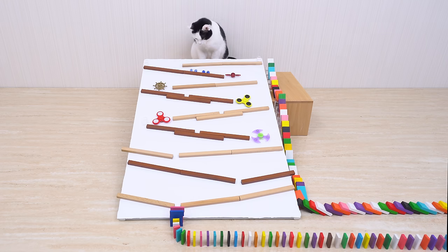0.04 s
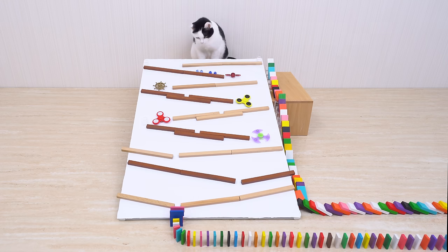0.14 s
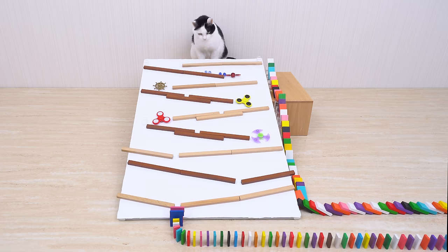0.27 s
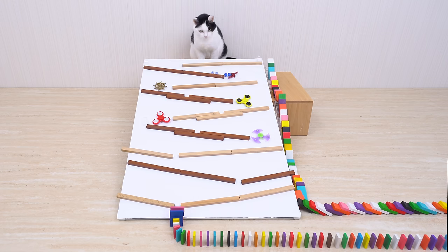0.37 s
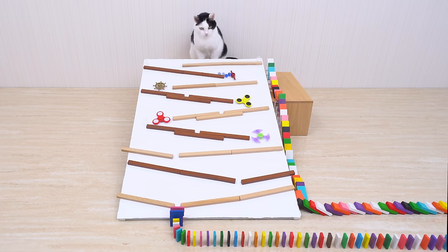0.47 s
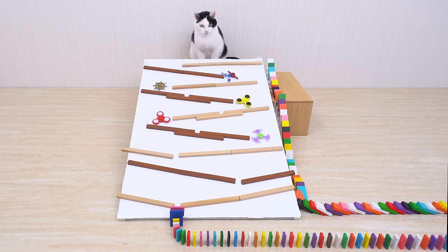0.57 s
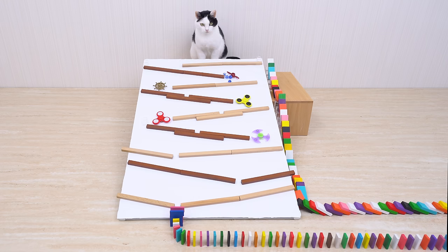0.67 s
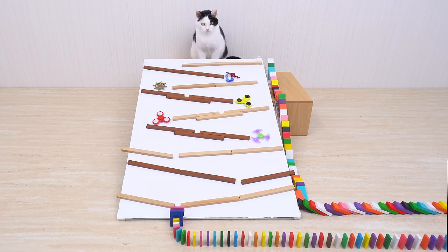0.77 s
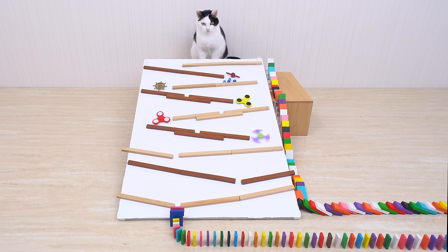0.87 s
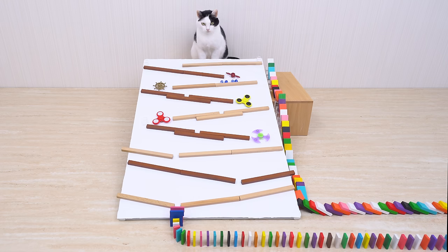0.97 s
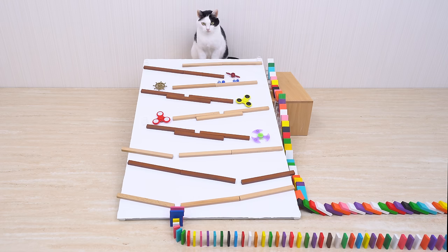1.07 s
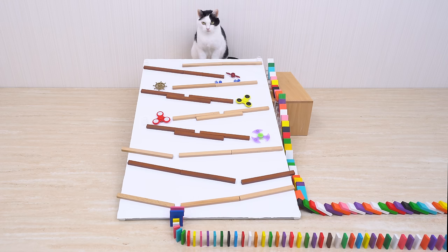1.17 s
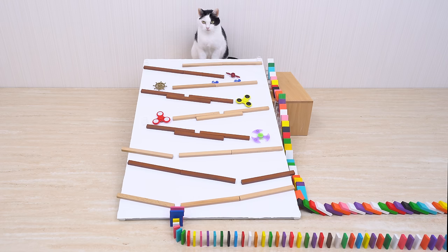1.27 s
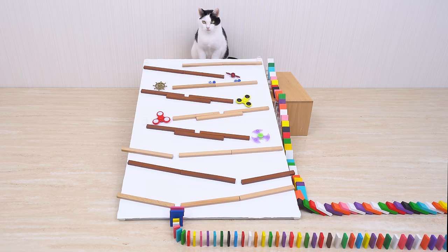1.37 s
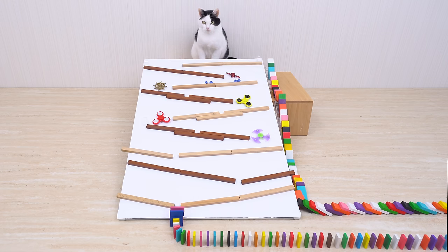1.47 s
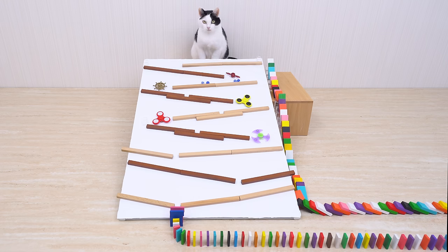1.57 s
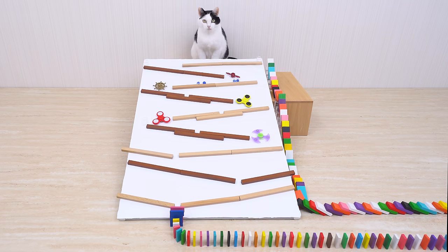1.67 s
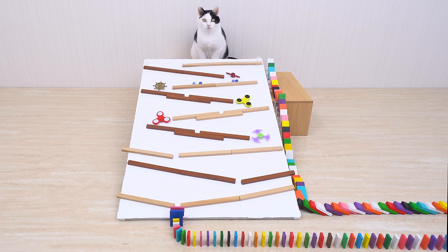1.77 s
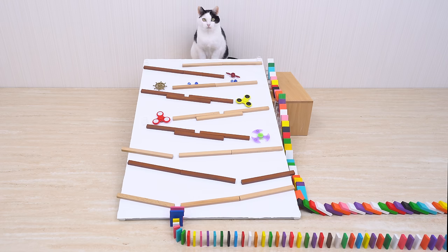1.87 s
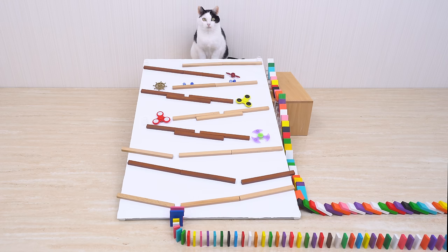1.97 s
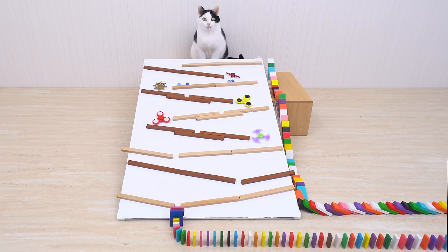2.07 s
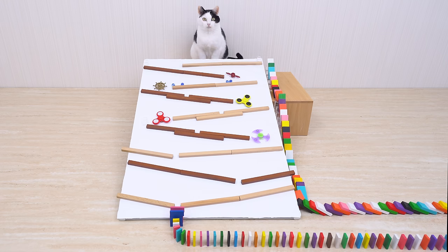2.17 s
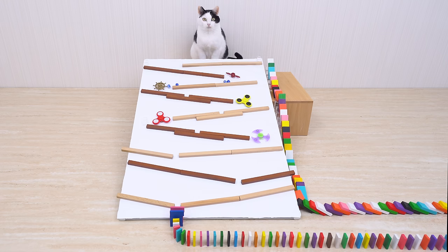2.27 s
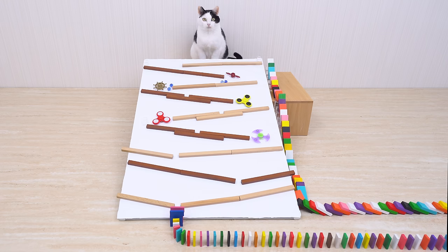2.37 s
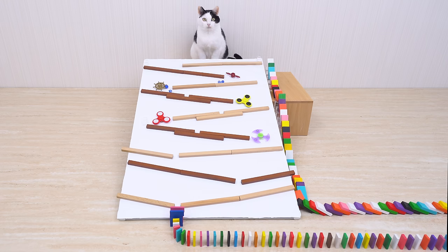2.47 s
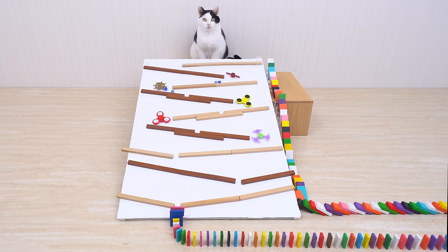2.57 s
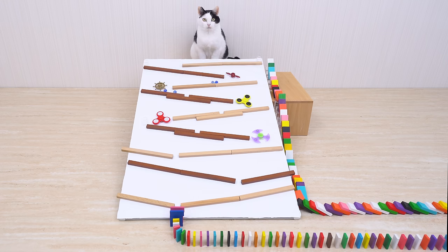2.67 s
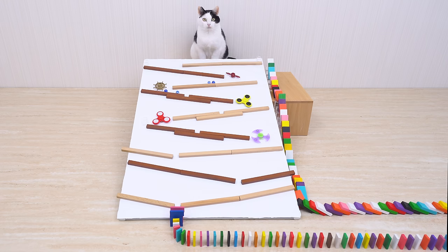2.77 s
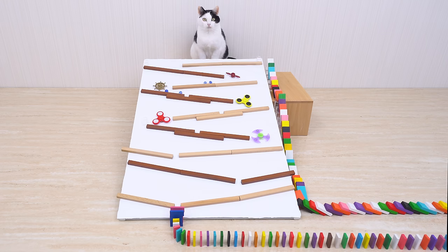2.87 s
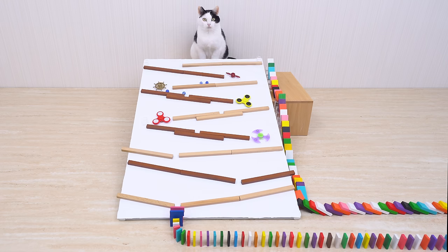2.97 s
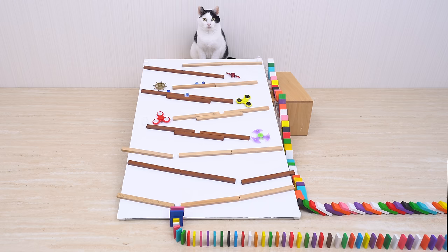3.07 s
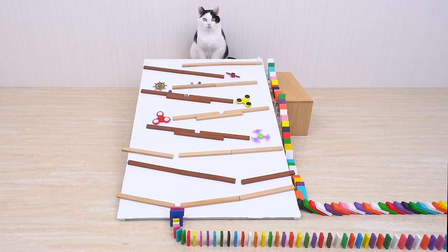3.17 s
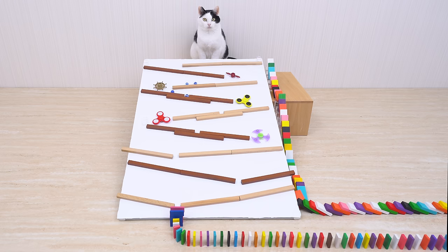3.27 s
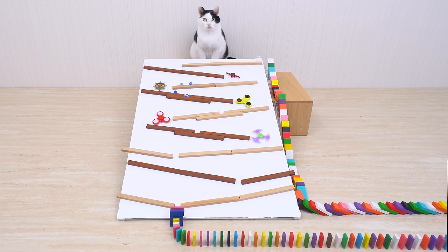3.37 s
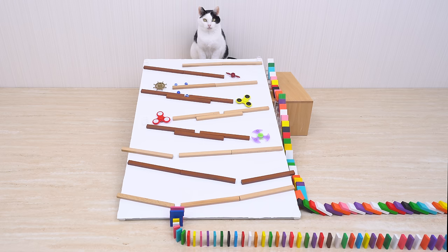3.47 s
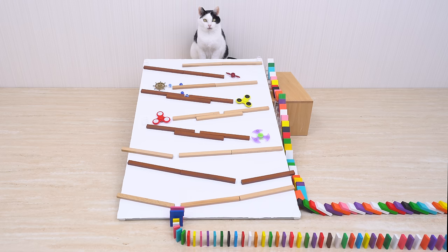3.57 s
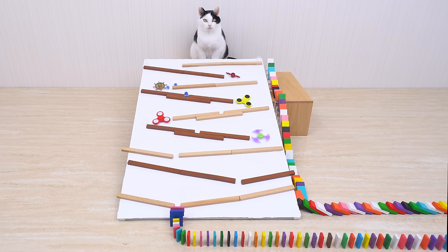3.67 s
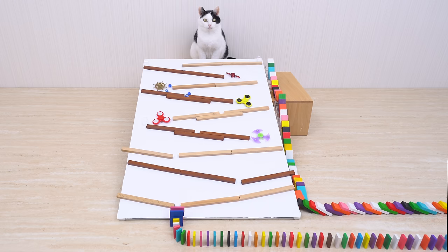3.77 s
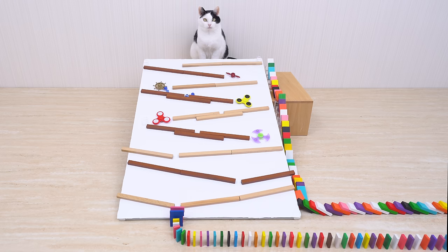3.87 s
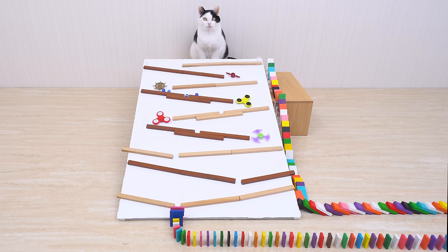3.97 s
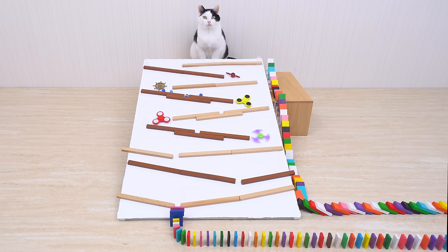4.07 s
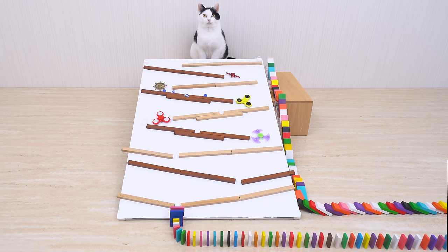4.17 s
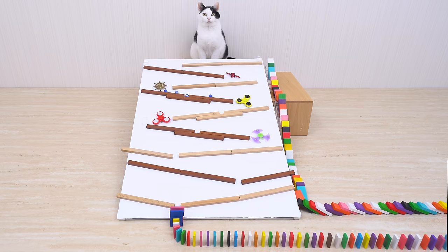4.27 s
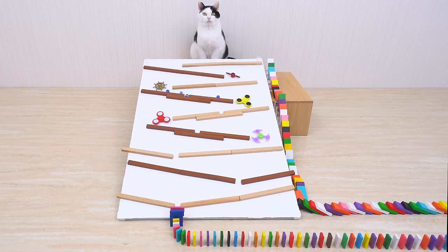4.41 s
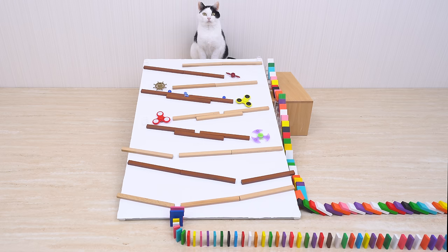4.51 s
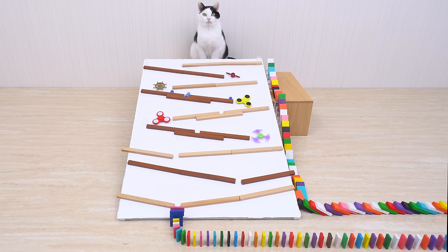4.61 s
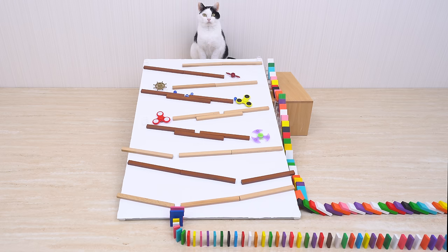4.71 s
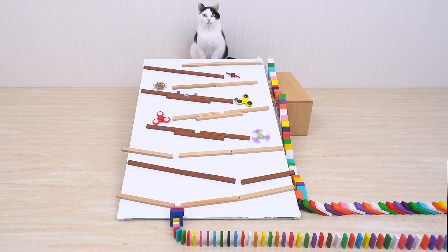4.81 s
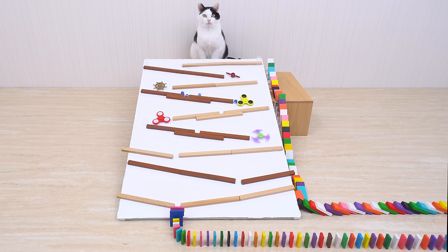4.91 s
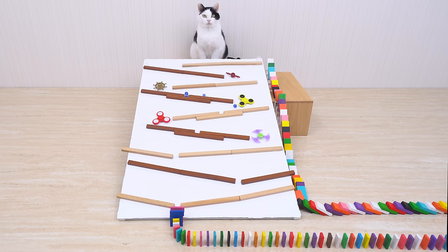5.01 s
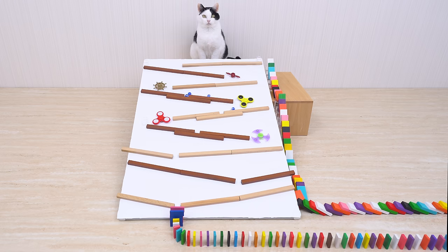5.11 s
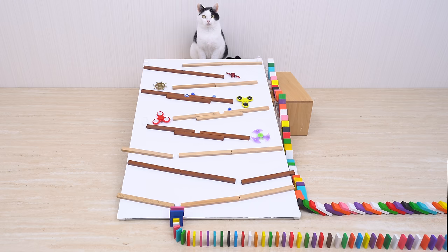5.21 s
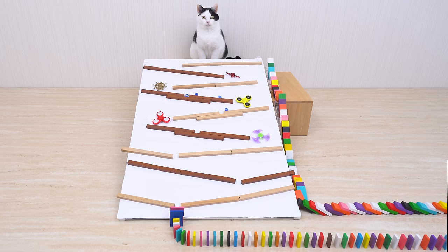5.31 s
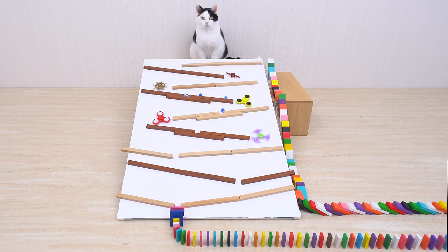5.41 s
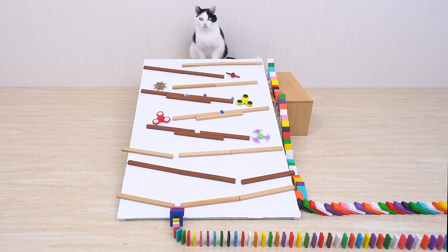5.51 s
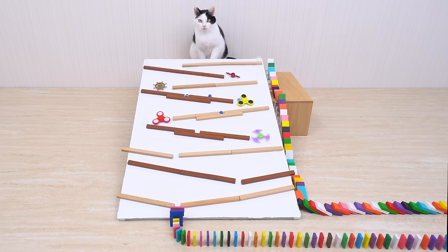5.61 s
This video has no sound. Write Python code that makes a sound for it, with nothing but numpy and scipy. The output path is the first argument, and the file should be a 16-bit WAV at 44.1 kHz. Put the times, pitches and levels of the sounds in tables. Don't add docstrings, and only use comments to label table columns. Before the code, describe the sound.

Several small glass marbles run down a slatted, tilted hollow board, close to the microphone in a quiet bare room. A busy cluster of clicks, glass clinks and a ringing metal spinner comes in the first second, then soft rolling and light bumps, then scattered sharp wooden cracks with hollow thumps until the end. A near wall throws back each click.

```python
import sys
import numpy as np
from scipy import signal
from scipy.fft import rfft, irfft
from scipy.io import wavfile

SR = 44100
rng = np.random.default_rng(int(sys.argv[2]) if len(sys.argv) > 2 else 0)


def rack_gain(trim_db):
    fader = np.asarray(trim_db, float)
    return 10 ** (fader / 20)


def wav_out(sig):
    wavfile.write(sys.argv[1], SR, np.round(np.clip(np.atleast_2d(sig).T, -1, 1) * 32767).astype(np.int16))


N = 249165
TOUCH_DELAY_S = 0.0006

# (freq_hz, density_db)
RASP = [(700, -10), (1100, -1.5), (2000, 4), (4300, -6), (5200, -15), (12000, -24.5), (13300, -53.5)]
# (start_s, level_db, board_pitch_hz)
BUMPS = [(.17, -55, 550), (0.2866, -40.5, 412), (0.408, -39.5, 524), (0.549, -37, 420), (.584, -30, 427.5),
         (1.557, -65, 344), (1.994, -40.5, 430), (2.024, -50, 422.5), (2.063, -59.5, 400),
         (2.107, -49.5, 415), (2.151, -44.5, 412), (2.178, -56, 428), (2.275, -43, 393), (2.313, -53, 433),
         (2.657, -63, 424), (3.4641, -37.5, 405), (3.488, -56.5, 444), (3.518, -60, 393),
         (3.915, -40.5, 377), (4.003, -45, 657), (4.509, -55, 795), (4.7587, -36.5, 635), (4.966, -53, 420)]

# (board_pitch_hz, thump_db under the crack,
# own pitches [(lift_db, freq_hz, width_hz)], slat knocks [(freq_hz, level_db over the thump, t60_s)])
TOP_SLAT = (540, -19, [(9.3, 3298, 330)], [(571, 2.5, 0.21), (488.4, 0, 0.2), (420, 3, 0.084),
            (288.4, -2, 0.099)])
SHORT_SLAT = (600, -18, [(6.7, 1830, 870)], [(983, 7.4, 0.11), (1050, 1.7, 0.074)])
LONG_SLAT = (675, -23.5, [(3, 2110, 180), (3, 4300, 1100)], [(789, 4.5, 0.11), (404.4, 4.5, 0.11),
             (257.5, -5.5, 0.18)])
SLAT_FOOT = (380, -20.5, [(1.2, 2800, 400)], [(392.6, 1, 0.093), (791, 0, 0.12), (267.5, -2, 0.1)])
HUB = (570, -18.5, [(10, 2000, 460), (3.5, 4440, 310), (0, 4050, 1400)], [(789, 4.5, 0.12),
       (390, -4.5, .1)])
LOW_SLAT = (430, -24.5, [(4.1, 4070, 970)], [(575, 9.3, 0.055)])
RAIL = (610, -12.5, [(5.88, 2730, 640)], [])
EDGE = (396, -25, [(-4, 1000, 1700)], [])
THICK_SLAT = (470, -24.5, [(6.9, 2530, 1140)], [(525, 2.4, 0.1), (966, 1.5, .08)])

# (start_s, crack_db, glass_tick_db, glass_fizz_db)
ON_TOP_SLAT = [(0.6874, -21.5, -38, -48), (0.824, -24, -34.5, -33), (0.9096, -24.5, -42.5, -54.5),
               (0.9533, -24, -42, -47), (1.0238, -24.5, -44.5, -54), (1.0711, -38, -56, -71)]
ON_SHORT_SLAT = [(1.2773, -43.5, -77.5, -104), (1.403, -44, -72.5, -77), (2.6705, -41.5, -73, -65)]
ON_LONG_SLAT = [(2.5132, -24, -41, -49), (2.7172, -26, -45.5, -52.5), (3.2313, -27.5, -59, -74),
                (3.8494, -26, -45.5, -49)]
ON_SLAT_FOOT = [(3.1613, -32.5, -58.5, -70), (4.0283, -26, -49, -50), (4.0792, -32.5, -56, -43),
                (4.7138, -39.5, -94, -83)]
ON_HUB = [(3.7523, -34, -43, -46), (4.6079, -34, -42.5, -49), (5.0818, -39.5, -67.5, -100)]
ON_THICK_SLAT = [(5.1421, -21.5, -38.5, -46.5)]
ON_LOW_SLAT = [(5.5597, -33.5, -57, -60.5), (5.6348, -27.5, -49.5, -49)]
ON_RAIL = [(0.0733, -41, -76, -100), (0.2189, -50, -92, -85), (0.3392, -42.5, -65, -45.5),
           (0.4487, -38, -42, -40.5), (0.5835, -38, -36, -67)]
ON_EDGE = [(0.5929, -30.5, -36.5, -33.5), (1.9474, -62, -83, -90), (2.3386, -46.5, -76, -44),
           (3.6836, -42, -54.5, -49.5), (3.9266, -39.5, -48.5, -43.5), (4.7589, -32, -44, -34)]
LANDINGS = [(TOP_SLAT, ON_TOP_SLAT), (SHORT_SLAT, ON_SHORT_SLAT), (LONG_SLAT, ON_LONG_SLAT),
            (SLAT_FOOT, ON_SLAT_FOOT), (HUB, ON_HUB), (LOW_SLAT, ON_LOW_SLAT),
            (THICK_SLAT, ON_THICK_SLAT), (RAIL, ON_RAIL), (EDGE, ON_EDGE)]


def evened(x):
    return x / np.sqrt(np.mean(x ** 2) + 1e-20)


def read(points, hz):
    f, value = np.transpose(points)
    return np.interp(np.log(hz + 1), np.log(f + 1), value)


def add(mix, start_s, sound):
    part = mix[round(start_s * SR):][:len(sound)]
    part += sound[:len(part)]


def ring(hz, t60_s, rise_s, length_s):
    t = np.arange(round(length_s * SR)) / SR
    decay = rack_gain(-60 * t / t60_s)
    return np.sin(2 * np.pi * hz * t) * decay * (1 - np.exp(-t / rise_s))


def coloured(points):
    hz = np.fft.rfftfreq(N, 1 / SR)
    spectrum = rfft(rng.standard_normal(N)) * rack_gain(read(points, hz))
    return evened(irfft(spectrum, N))


def air():
    # (freq_hz, density_db)
    air_colour = [(12, -57.5), (20, -25), (93, -8.5), (148, -10), (234, -5.5), (550, -3.5), (850, -10),
                  (1390, -15), (1640, -27.5), (4000, -36), (12800, -37), (13300, -72.5), (22000, -100)]
    return rack_gain(-69) * coloured(air_colour)


def earlier_landing():
    t = np.arange(N) / SR
    return rack_gain(-59 - 60 * t / 0.36) * coloured(RASP)


def scuffs():
    # (start_s, level_db)
    skids = [
        (1.94, -70.5),
        (.46, -68.5),
    ]
    rise_s, t60_s = 0.015, 0.4
    swell = np.zeros(N)
    t = np.arange(SR // 2) / SR
    for start_s, level_db in skids:
        add(swell, start_s, rack_gain(level_db - 60 * t / t60_s) * (1 - np.exp(-t / rise_s)))
    return swell * coloured([(1500, -21.5), (4300, 0.5), (5500, -8), (11500, -10.5), (13500, -30)])


def board(centre_hz, octaves, damping):
    # (freq_hz, width_hz, level_db)
    board_modes = [(264, 46, -23.5), (295, 15, -1), (411.8, 30, 7.5), (449, 10, -8), (469, 42, 5.5),
                   (529, 65, 9.5), (731.7, 20, -0.5), (800.6, 40.8, 7.5), (930, 37.6, 2.5), (1240, 174, -5)]
    body = 0
    for hz, width_hz, level_db in board_modes:
        off_centre = np.log2(hz / centre_hz) / octaves
        t60_s = 2.2 / width_hz / damping
        body = body + rack_gain(level_db - 8.4 * off_centre ** 2) * ring(hz, t60_s, 0.00054, 0.12)
    return body / abs(body).max()


def rolling():
    # (start_s, level_db)
    effort = [(0, -58.5), (.12, -61), (.45, -62), (.6, -60.5), (.9, -61), (1.3, -77.5), (1.75, -79.5),
              (2, -70), (2.3, -70.5), (2.45, -77.5), (2.72, -59.5), (3.05, -72.5), (3.4, -63), (3.65, -66),
              (4.3, -88.5), (4.65, -69), (5.3, -71.5), (5.65, -97)]
    t = np.arange(N) / SR
    bumps = rng.standard_normal(N)
    bumps = bumps * rack_gain(2.5 * np.minimum(rng.exponential(1, N), 3))
    bumps = bumps * (rng.random(N) < 500 / SR)
    hum = evened(signal.oaconvolve(bumps, board(458, 1.0, 1.3))[:N])
    rasp = rack_gain(-17) * coloured(RASP)
    return rack_gain(np.interp(t, *np.transpose(effort))) * (hum + rasp)


def spinner(blows, modes, shapes, rattle_db):
    out = np.zeros(N)
    knots = np.arange(0, SR // 2, 300)
    t = np.arange(2000) / SR
    for start_s, blow_db, lean_db, side_db in blows:
        levels_db = [blow_db + db + min(lean * lean_db, 0) + side * side_db for db, lean, side in shapes]
        for level_db, (hz, t60_s) in zip(levels_db, modes):
            flutter = np.interp(np.arange(SR // 2), knots, rng.standard_normal(SR // 600 + 1))
            add(out, start_s + TOUCH_DELAY_S, rack_gain(level_db + 4.0 * flutter) * ring(hz, t60_s, 0.0003, 0.5))
        high = signal.butter(2, 5000, "highpass", fs=SR)
        rattle = signal.lfilter(*high, rng.standard_normal(2000))
        rattle_level = rack_gain(levels_db[-2] + rattle_db - 60 * t / 0.012)
        add(out, start_s + TOUCH_DELAY_S, rattle_level * rattle)
    return out


def first_spinner():
    # (start_s, level_db, lean_db to one side of the arm, side_modes_db)
    first_blows = [
        (0.3391, -42.5, -16, -2.5),
        (0.4496, -43, 4.5, -0.5),
        (0.5404, -41, -5, -12.5),
        (0.5928, -30.5, -3, -27),
    ]
    # (freq_hz, t60_s)
    first_modes = [(4231, .3), (7905, .2), (8157, .26), (15108, .07), (15518, .12)]
    # (level_db, lean_share, side_share)
    first_shapes = [(-15.5, -.2, 1.01), (-1.7, 0.88, .01), (-6, -0.93, .01), (6.6, -0.44, 1.2),
                    (0.6, .3, 1.01)]
    return spinner(first_blows, first_modes, first_shapes, rattle_db=2.5)


def second_spinner():
    # (start_s, level_db, lean_db, side_mode_db)
    second_blows = [(2.3361, -37, 21, -3.5), (2.5274, -37, 28, -15), (2.5632, -47.5, -11, -4.5),
                    (3.926, -43, -10, -3), (4.0667, -60, -3, -19), (4.079, -53, 1, 5)]
    # (freq_hz, t60_s)
    second_modes = [(8479, .05), (11087, .03), (14950, .025)]
    # (level_db, lean_share, side_share)
    second_shapes = [(0, -1.5, 0), (0, 0, 1), (-2, 1, 0)]
    return spinner(second_blows, second_modes, second_shapes, rattle_db=-4.0)


def knocks():
    out = np.zeros(N)
    for (_, thump_db, _, modes), rows in LANDINGS:
        for start_s, crack_db, *_ in rows:
            for hz, level_db, t60_s in modes:
                knock = -rack_gain(crack_db + thump_db + level_db) * ring(hz, t60_s, 0.0023, 0.2)
                add(out, start_s + TOUCH_DELAY_S, knock)
    for start_s, level_db, hz in BUMPS:
        add(out, start_s, rack_gain(level_db - 8.5) * ring(hz, 0.11, 0.0023, 0.2))
    return signal.sosfilt(signal.butter(2, 180, "highpass", fs=SR, output="sos"), out)


def contact(crack_db, tick_db, fizz_db, tocks=()):
    colour = [(300, crack_db - 10.5), (900, crack_db + 14), (1400, crack_db + 11.5),
              (2200, crack_db + 16.0), (4400, crack_db + 13.5),
              (6200, tick_db + 24.5), (9000, tick_db + 24.5),
              (11000, fizz_db + 23.5), (15500, fizz_db + 18.5), (17500, fizz_db - 6.5)]
    hz = abs(np.fft.fftfreq(2048, 1 / SR))
    gain_db = read(colour, hz)
    for lift_db, peak_hz, width_hz in tocks:
        gain_db = gain_db + lift_db / (1 + (2 * (hz - peak_hz) / width_hz) ** 2)
    log_gain = np.log(rack_gain(gain_db))
    phase = -signal.hilbert(log_gain).imag
    click = np.fft.ifft(np.exp(log_gain + 1j * phase)).real[:1024]
    slips = rng.standard_normal(90) * (rng.random(90) < 0.2) * np.exp(-np.arange(90) / 30)
    return np.convolve(click, np.r_[-1, 0.15 * slips])


def landing(place, crack_db, tick_db, fizz_db):
    board_hz, thump_db, tocks, _ = place
    sound = -rack_gain(crack_db + thump_db + 6) * board(board_hz, 0.69, 1.1)
    add(sound, 0, contact(crack_db, tick_db, fizz_db, tocks))
    return sound


def marbles():
    # (start_s, tick_db, fizz_db)
    clinks = [(.282, -67, -86), (0.384, -43, -47), (0.4027, -37, -49), (0.543, -32, -37), (.5493, -40, -42),
              (.5612, -54, -47), (0.6607, -42, -44), (0.8742, -40, -42.5), (0.9502, -32.5, -38),
              (1.347, -67, -91.5), (4.0042, -43.5, -56), (4.067, -44.5, -55.5), (4.9108, -61.5, -59.5),
              (5.3492, -66, -61.5), (5.514, -70, -68)]
    out = np.zeros(N)
    for place, rows in LANDINGS:
        for start_s, *levels_db in rows:
            add(out, start_s + TOUCH_DELAY_S, landing(place, *levels_db))
    for start_s, tick_db, fizz_db in clinks:
        add(out, start_s + TOUCH_DELAY_S, contact(tick_db - 8.5, tick_db - 4, fizz_db + 1.0))
    for start_s, level_db, hz in BUMPS:
        add(out, start_s, rack_gain(level_db - 8) * board(hz, 0.32, 1.0))
    return out


def tail():
    # (freq_hz, t60_s)
    room_decay = [(200, 0.27), (500, 0.39), (1000, 0.55), (2000, 0.48), (4000, 0.52), (8000, .45),
                  (16000, 0.2945)]
    # (freq_hz, level_db)
    room_colour = [(200, -7), (600, 8), (1400, 2), (2500, 1), (4500, 1), (9000, -2.5), (15700, -0.5),
                   (16200, -28)]
    taps = np.zeros(SR)
    at = np.arange(0, SR - 20, 20) + rng.integers(0, 20, (SR - 1) // 20)
    taps[at] = rng.choice([-1., 1.], len(at))
    hz, t, z = signal.stft(taps, SR, nperseg=256)
    gain_db = read(room_colour, hz)[:, None] - 60 * t / read(room_decay, hz)[:, None]
    out = signal.istft(z * rack_gain(gain_db), SR, nperseg=256)[1][:SR]
    out = out * (1 - np.exp(-(np.arange(SR) / SR / 0.0089) ** 2))
    return out / np.linalg.norm(out)


def room(x):
    # (delay_s, level_db)
    reflections = [(.0009, -12.5), (.0033, -10.5), (0.0138, -6), (0.0144, -16), (0.021, -21)]
    early = np.zeros(SR // 10)
    for delay_s, level_db in reflections:
        early[round(delay_s * SR)] = rack_gain(level_db)
    early = signal.lfilter(*signal.butter(1, 7000, fs=SR), early)
    scatter = rng.choice([-1., 1.], 70) * (rng.random(70) < 0.25) * np.exp(-np.arange(70) / 30)
    add(early, 0, np.r_[0.85, 0.3 * scatter])
    out = signal.oaconvolve(x, early)[:N]
    turn = np.pi * np.arange(N) / SR * 2.3
    for k in range(3):
        share = np.sqrt(2 / 3) * np.cos(turn + k * np.pi / 3)
        out += rack_gain(-2.5) * signal.fftconvolve(x * share, tail())[:N]
    return out


def scene():
    near = marbles() + first_spinner() + second_spinner() + rolling()
    near = signal.sosfilt(signal.butter(2, 190, "highpass", fs=SR, output="sos"), near)
    mix = room(near) + air() + earlier_landing() + knocks() + scuffs()
    return mix[None]


def roll_off(x):
    return signal.sosfilt(signal.butter(12, 17060, fs=SR, output="sos"), x)


def record(dry):
    limited = signal.sosfilt(signal.ellip(8, 0.5, 50, 16400, fs=SR, output="sos"), dry)
    return roll_off(limited)


dry = scene()
out = record(dry)
wav_out(out)
```